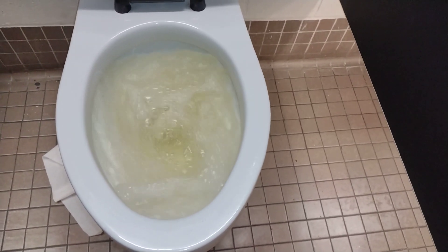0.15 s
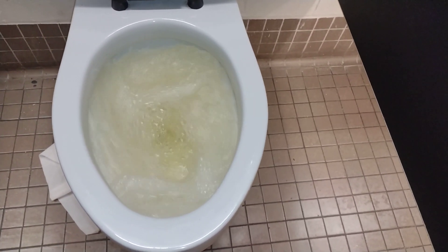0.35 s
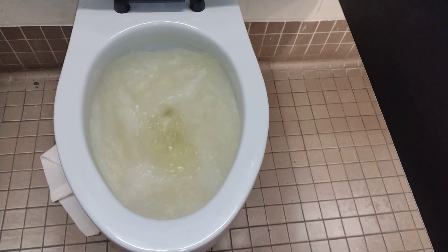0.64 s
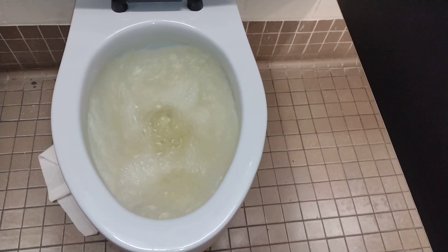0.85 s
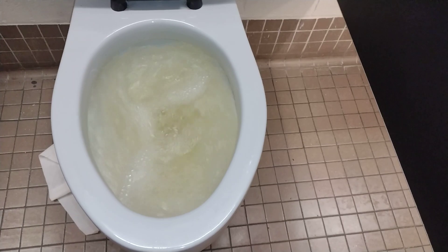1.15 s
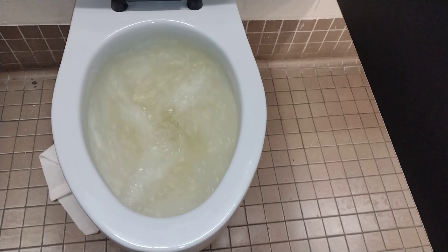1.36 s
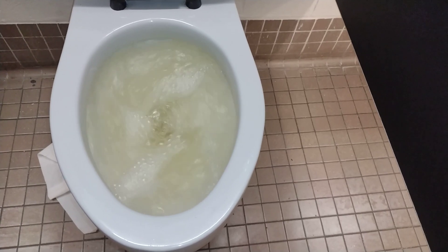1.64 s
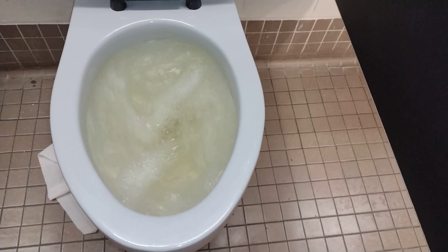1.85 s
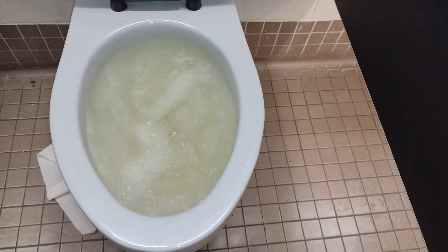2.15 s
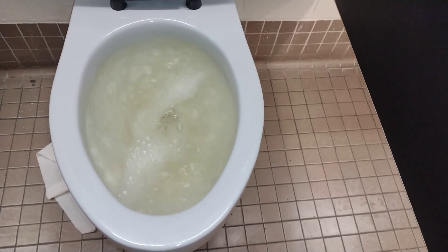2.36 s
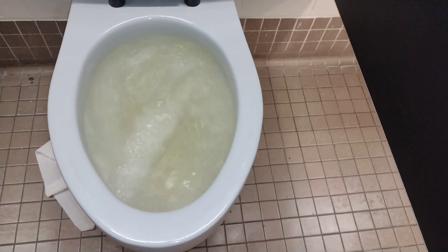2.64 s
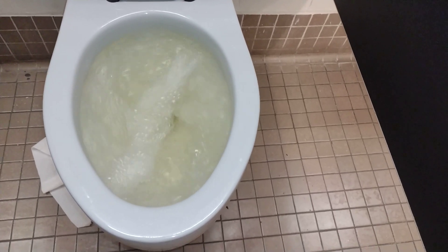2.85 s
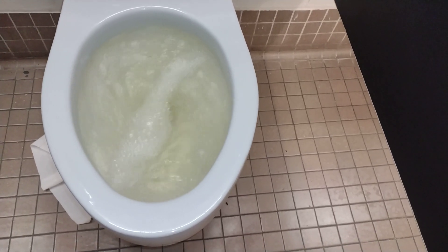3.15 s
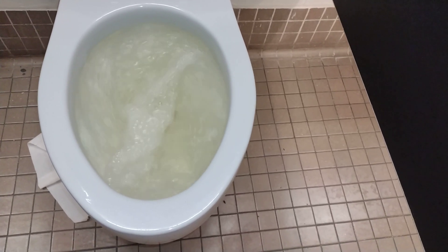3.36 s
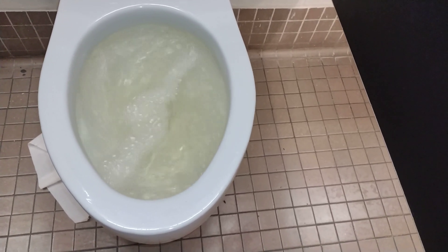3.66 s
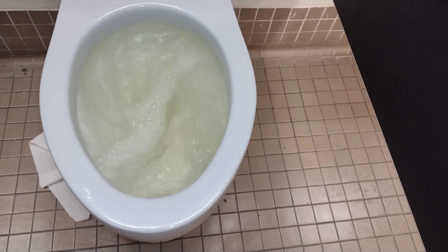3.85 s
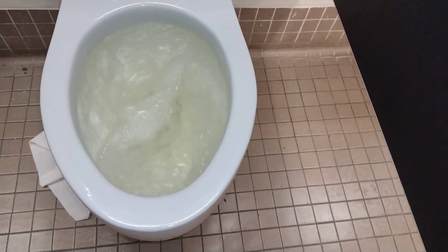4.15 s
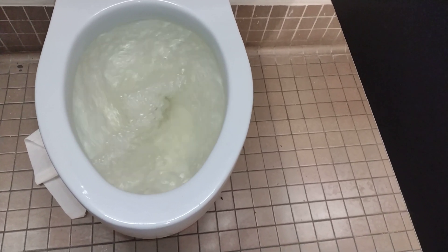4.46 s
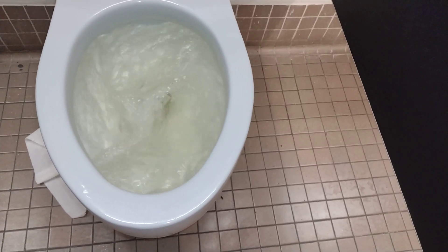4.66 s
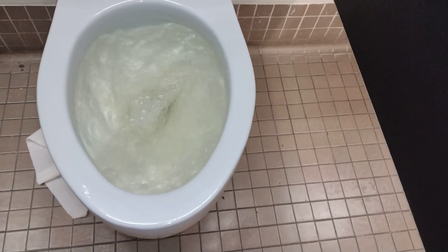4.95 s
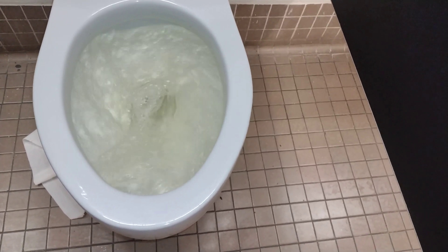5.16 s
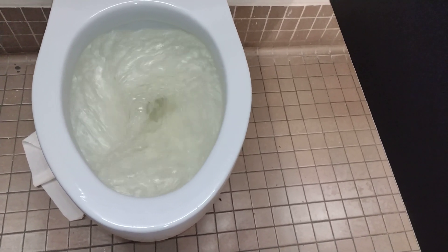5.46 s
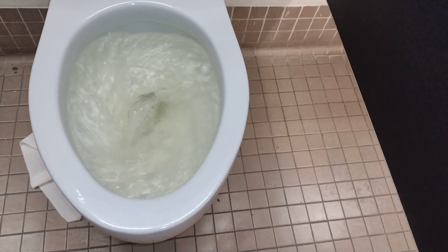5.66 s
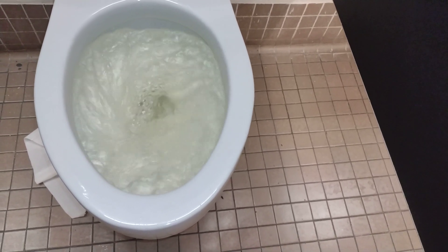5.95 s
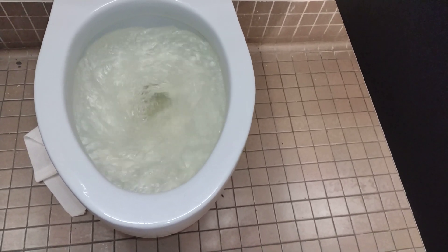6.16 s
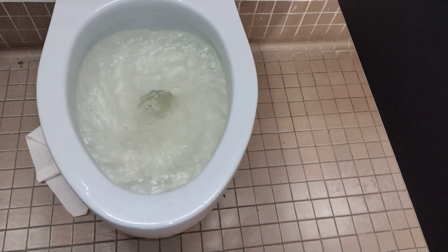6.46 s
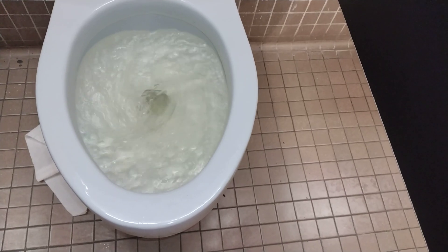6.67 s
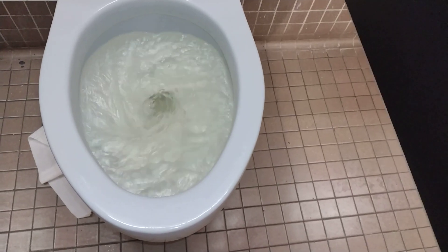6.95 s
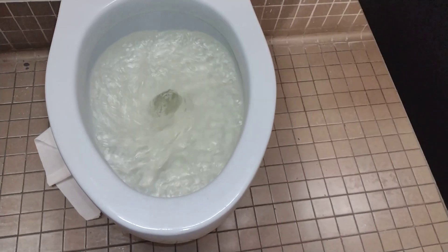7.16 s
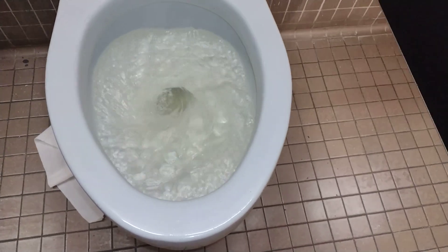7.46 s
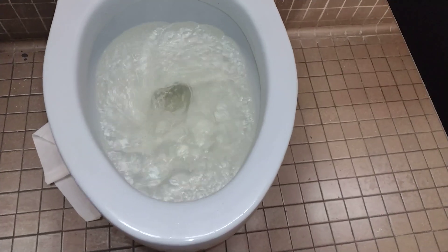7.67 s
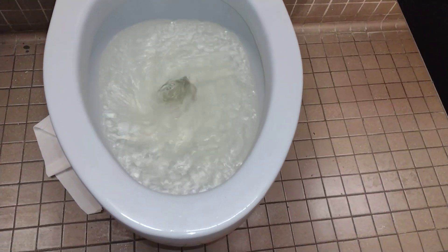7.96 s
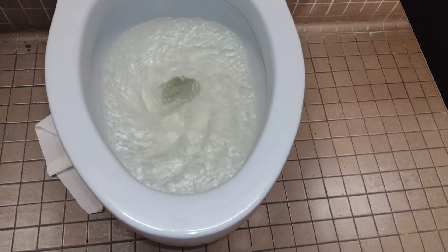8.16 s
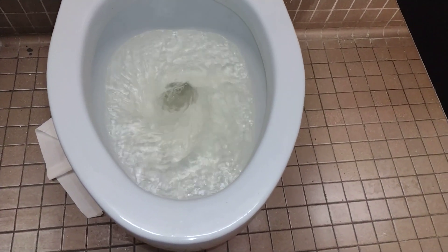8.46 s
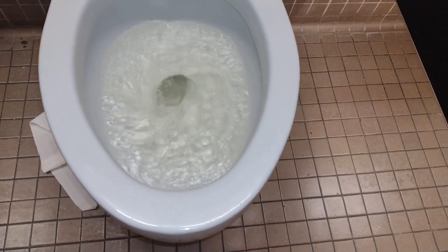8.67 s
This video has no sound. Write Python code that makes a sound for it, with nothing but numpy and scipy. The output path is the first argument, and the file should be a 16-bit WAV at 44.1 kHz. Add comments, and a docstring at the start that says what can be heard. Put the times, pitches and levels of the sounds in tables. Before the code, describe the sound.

A toilet already in full flush roars and hisses in a small tiled restroom, gurgles down, shuts off abruptly, and leaves sparse drips over faint hum.

```python
"""A rush of water comes first: jets hiss under a toilet rim, spray and foam roar, the trap gurgles and a
tiled room booms, all noise shaped by resonances. Air whistles in a rim hole; bubbles and bursts gulp and spurt.
The pressure-fed valve shuts, leaving ringing drips, foam ticks, a narrow drain ring and one knock
over air noise and a swelling hum. Two microphone ports a hand apart receive partly shared noise."""
import sys
import numpy as np
from scipy import signal
from scipy.fft import rfft, irfft, next_fast_len
from scipy.io import wavfile
from scipy.ndimage import uniform_filter1d

SR = 44100
rng = np.random.default_rng(int(sys.argv[2]) if len(sys.argv) > 2 else 0)


def put_to_file(sound):
    """Save the sound as 16-bit audio at rate SR, in the file named by the first command-line argument."""
    columns = np.atleast_2d(sound).T  # one column per channel
    safe = np.clip(columns, -1, 1)
    whole_steps = np.round(safe * 32767)
    wavfile.write(sys.argv[1], SR, whole_steps.astype(np.int16))


N = 388521  # samples
T = np.arange(N) / SR  # time, s

# Ventilation and trickle spectrum: frequency_hz, relative_density_db (per Hz)
QUIET_SPECTRUM = [(24, -42.5), (40, -12), (112, -2.5), (176, -10), (312, -4), (433, -13.5), (1020, -13),
                  (1440, -24), (1810, -20.5), (2840, -26), (4500, -33.5), (14800, -45.5), (16000, -45)]
# Room and drain resonances under the trickle: frequency_hz, width_hz, relative_level_db
PIPE_MODES = [(79.7, 15, -3), (118.8, 17, -1), (255, 41, -3.5), (355, 46, -6.5), (500, 24, -7),
              (650, 21, -7.5), (1060, 29, -11.5), (1340, 30, -17), (1575, 52, -17.5), (1800, 35, -8.5),
              (2240, 1400, -22.5)]
# Coherence of the two ports: frequency_hz, shared_fraction
PORT_COHERENCE = [(60, 1), (250, 0.89), (550, 0.72), (800, 0.26), (1500, 0.62), (2500, 0.28), (5000, 0.025),
                  (15000, 0.067)]
# Spectral balance of the ports: frequency_hz, left_minus_right_db
PORT_TILT = [(60, -1.5), (130, 0.5), (290, -1), (640, 1.5), (1410, -3), (3100, 1.5), (6820, 0.5),
             (15000, -0.5)]
# Drips and large drain bubbles: start_s, level_db, pitch_hz (at onset)
BUBBLES = [(5.7254, -56, 2600), (5.765, -60, 2390), (5.784, -59, 463), (5.933, -43, 1094),
           (5.926, -49, 1620), (6.058, -59, 1850), (6.243, -60.5, 2200), (6.288, -62, 1760),
           (6.298, -50, 1060), (6.436, -56, 354), (6.52, -58, 2020), (6.6, -54.5, 327), (6.651, -63, 2240),
           (6.761, -60, 1712), (7.199, -52.5, 374), (7.2404, -56.5, 2080), (7.249, -52.5, 322),
           (7.325, -67, 2200), (7.482, -57, 257), (7.5617, -54.5, 2200), (7.627, -62, 3930),
           (7.685, -64.5, 2400), (7.6874, -61, 1490), (7.719, -58, 2910), (7.734, -56, 622),
           (7.738, -57, 1820), (7.785, -65, 2300), (7.806, -50.5, 1400), (8.025, -53, 640),
           (8.0694, -57.5, 1400), (8.1502, -59, 1396), (8.16, -57, 3690), (8.2167, -59.5, 1745),
           (8.217, -55, 3040), (8.3184, -62, 4060), (8.4716, -55, 2100), (8.477, -56, 2510),
           (8.572, -51, 2104), (8.6198, -58, 1035)]
# Foam bursting: start_s, level_db (before the shares of snap and ring), centre_hz (of the ring)
TICKS = [(5.7035, -38, 4900), (5.7634, -57, 8460), (5.8052, -52, 8800), (5.8163, -50, 6270),
         (5.8541, -44, 11100), (5.8898, -44.5, 6020), (5.9835, -46, 10670), (6.0342, -48, 3880),
         (6.0583, -58, 7280), (6.0706, -53, 9700), (6.124, -54.5, 4110), (6.2229, -59.5, 11000),
         (6.3232, -58, 5920), (6.345, -56, 4000), (6.5008, -53, 6600), (6.5136, -54, 4160),
         (6.7024, -58, 5100), (6.7207, -49, 4600), (6.7412, -59, 6670), (6.759, -48, 5700),
         (7.2356, -57, 8600), (7.2975, -57.5, 7440), (7.3179, -55, 12300), (7.3417, -48, 6300),
         (7.3824, -59, 10470), (7.6267, -54.5, 10440), (7.7288, -54, 7370), (7.8057, -53, 4340),
         (7.8214, -55, 6160), (7.8535, -48, 3620), (8.135, -60, 4500), (8.4384, -55.5, 10260),
         (8.6459, -56.5, 7610)]
# Modes of the knocked object: frequency_hz, relative_level_db, t60_s
KNOCK_MODES = [(835, -6, .04), (2690, -2, .03), (2915, 0, .045), (3270, -1, .03), (3550, -6, .02)]
# Slugs slapping the trap or rim hole: start_s, level_db (before the shares), pitch_hz (at onset)
GULPS = [(0.319, -6, 1240), (0.503, -8, 1420), (0.598, -10, 1010), (0.685, -1.5, 1780), (0.893, -4.5, 1200),
         (1.542, -5, 1710), (2.609, -8, 1780), (2.696, -4, 1134), (2.756, -12, 950), (2.867, -6.5, 900),
         (2.995, -14, 770), (3.092, -18, 791), (3.122, -8.5, 850), (3.15, -3.5, 1020), (3.201, -11, 810),
         (3.322, -19, 1000), (3.443, -24, 745), (3.468, -6.5, 1075), (3.56, -16, 738), (3.65, -20, 727),
         (3.8, -11.5, 698), (3.975, -20, 764), (4.147, -12, 970), (4.338, -15.5, 1630), (4.42, -20, 1760),
         (4.454, -27, 1070), (4.496, -16.5, 1080), (4.526, -18, 1114), (4.649, -15.5, 1660),
         (4.772, -21.5, 1270), (4.868, -24, 980), (4.884, -20, 860), (4.924, -23.5, 750),
         (4.788, -18.5, 1140), (4.972, -20.5, 1280), (4.975, -22.5, 1800), (5.017, -26.5, 750),
         (5.163, -39, 795), (5.19, -42, 198), (5.204, -34, 765), (5.248, -30.5, 1660)]
# Spray bursts: start_s, level_db (before the shares), centre_hz, lift_db (of the jets), lift_length_s
SPURTS = [(0.092, -6, 5000, 2.5, 0.028), (0.127, -16, 4970, 3.5, 0.24), (0.21, -8, 5360, 1, 0.016),
          (0.426, -12, 7000, 1.5, 0.2), (0.627, -13, 5620, 2.6, 0.14), (0.728, -4, 4660, 2.1, 0.035),
          (0.763, -15.5, 5500, 3, 0.33), (0.999, -11.5, 2540, 2.5, 0.063), (1.075, -2.5, 5740, 2.5, 0.075),
          (1.54, -2.5, 7200, 1, 0.0064), (1.829, -7, 5770, 3.5, 0.0095), (2.083, -8, 3080, 1.5, 0.014),
          (2.294, -13, 4740, 2.5, 0.045), (2.494, -7.5, 3850, 2, 0.014), (3.968, -13.5, 7600, 1.5, 0.025),
          (3.969, -16.5, 3240, 2.5, .03), (3.995, -21, 3930, -1, .008), (4.84, -29, 8000, -1.5, 0.019),
          (5.187, -28, 8150, 0, 0.035)]
# A pocket of air squeezed out: start_s, level_db, start_hz, end_hz, length_s
SQUIRT = (2.297, -16, 2600, 1750, .022)
# Rim-hole whistle: time_s, level_db (before the shares of noise and tone)
WHISTLE_LEVEL = [(.24, -42), (.296, -29.5), (.4, -35.5), (.46, -27.5), (.528, -18.5), (.604, -28.5),
                 (.655, -29), (.69, -26), (.75, -32.5), (.795, -23), (.84, -25), (.872, -40), (.95, -21.5),
                 (1.0, -31.5), (1.032, -24), (1.074, -33.5), (1.13, -23), (1.165, -35.5), (1.4, -31.5),
                 (1.75, -36)]
# Jet hiss spectrum: frequency_hz, relative_density_db (per Hz)
JET_SPECTRUM = [(3240, -29.5), (5500, -13), (6230, -4), (6820, 0), (8900, -0.5), (9600, -3), (13600, -3.5),
                (15200, -5), (16000, -13.5)]
# Dips and one ridge cut into the hiss by the emptying bowl: frequency_hz, width_hz, change_db
RIM_DIPS = [(2590, 65, -10), (2820, 100, -10), (3500, 74, -6.5), (4480, 100, -7.5), (5000, 60, -3.5),
            (5610, 110, -11.5), (7100, 100, -8.5), (8880, 420, 2.5), (9150, 200, -5.5), (9920, 150, -3.5),
            (10160, 150, -2.5)]
# Spray resonances, bowl full and then with the trap pulling: frequency_hz, width_hz, relative_level_db
SPRAY_FULL = [(2410, 110, -12), (3096, 60, 0), (3700, 410, -8.5), (4850, 330, -4), (5420, 200, -1.5),
              (5750, 110, 1.5), (6960, 160, -2.5)]
SPRAY_PULL = [(2540, 67, -5.5), (2754, 48, 0), (3097, 590, -3.5), (3730, 140, -12), (4020, 310, -9),
              (4870, 360, -3), (5420, 300, -1.5), (6260, 480, -1.5)]
# Bowl resonances, full, pulling and with the trap nearly empty: frequency_hz, width_hz, relative_level_db
BOWL_FULL = [(684, 160, -3.5), (830, 310, -5.5), (1050, 100, 0.5), (1140, 520, -3), (1426, 60, -2.5),
             (1730, 110, -4), (2070, 55, -3)]
BOWL_PULL = [(644, 38, -6), (741, 32, 1.5), (797, 55, -5.5), (894, 90, -7), (1080, 150, -2),
             (1168, 92, -0.5), (1320, 65, -4), (1440, 93, -5.5), (1670, 47, -2.5), (1920, 34, -8.5)]
BOWL_LOW = [(740, 110, 2), (863, 86, -0.5), (1085, 150, 4.5), (1338, 39, 8), (1654, 220, -2.5),
            (1940, 27, 0.5)]
# Room air modes, boom, deep and those heard only at first: frequency_hz, width_hz, relative_level_db
BOOM_MODES = [(258, 27, -9), (346, 73, -6.5), (403.3, 11, 6.5), (462, 15, -4), (528, 36, -6)]
DEEP_MODES = [(79.8, 6, 3), (124, 16, 1.5), (165.5, 15, -4), (218.5, 51, -2.5)]
EARLY_MODES = [(466.5, 20, 0), (489, 20, -3.5)]
# Progress of the flush: time_s, jet_flow_db, bowl_water_db
FLOW = [(0.0, -21, -27.5), (.22, -22, -30.5), (.37, -21.5, -27), (.5, -20, -28.5), (1.0, -23, -28.5),
        (1.19, -21.5, -27.5), (1.42, -19, -26.5), (1.7, -20.5, -27), (2.35, -22, -27.5), (2.8, -22, -26.5),
        (3.69, -27.5, -28), (4.05, -33, -33), (4.55, -42.5, -37), (5.2, -47, -44), (5.275, -51.5, -58),
        (5.305, -59, -56), (5.4, -65.5, -69), (5.88, -72.5, -71.5), (6.1, -71, -69)]

LAG, ROOM_LAG = 20, 8  # samples by which bowl sound and room air reach the right port later
PULL_S, LOW_S = 2.503, 4  # the trap starts to pull, then runs nearly empty
LAST_S, SHUT_S = 4.99, 5.3  # only the lowest gurgle is left, then the valve has shut
QUIET_DB, HISS_DB = -64, -82  # air noise and microphone self-noise
HUM_HZ, HUM_EARLY_DB, HUM_LATE_DB = 312.7, -78, -68  # levels before the shares of tone and waver
HUM_SWELL_S, HUM_RISE_S = 6.2, 1.0  # start and length of the swell
DRAIN_HZ, DRAIN_DB, DRAIN_FADE_S, DRAIN_FADE_LENGTH_S = 1070, -77, 6.2, 0.82
DRAIN_RING = 0.3  # how strongly a drip sets the drain ringing
CYCLES_AT_1K, CYCLES_SLOPE = 21., .4  # smaller bubbles ring for more cycles
CLIMB_AT_2K, CLIMB_SLOPE, CLIMB_MOST = .04, 3.1, .045  # and climb further in pitch, up to a limit
DRIP_SPLASH = .45  # greatest share of splash in a small drip
TICK_SNAP, TICK_RING = .6, 0.93  # shares of wide snap and narrow ring
KNOCK_S, KNOCK_DB = 7.272, -41
GULP_RING, GULP_SPLASH = 0.54, 0.46  # shares of bubble and splash
SPURT_RING, SPURT_SPLASH = .3, 0.7
TRAP_TOP_HZ = 2140  # low-pass corner of the gulps in the trap
WHISTLE_HZ, WHISTLE_WANDER_HZ = 1672, 24  # centre and rms wander of the tone
WHISTLE_NOISE, WHISTLE_TONE = 0.76, .7  # shares of narrow noise and clear tone
POCKET_DB, POCKET_START_S, POCKET_ATTACK_S = -31.5, 0.2, 0.044  # a second air pocket
POCKET_HOLD_S, POCKET_RELEASE_S = 0.41, 0.05
POCKET_START_HZ, POCKET_END_HZ = 2302, 1286  # its pitch drops as it closes
POCKET_DROP_S, POCKET_GLIDE_S = 0.285, 0.019  # middle and time constant of the drop
FULL_FLOW_DB = -20  # reference jet flow
SPRAY_DB, SPRAY_FOLLOWS, SPRAY_AFTER_DB = -23, 1.14, 11.5  # falls faster than flow; raised at the shutting
BOOM_DB, BOOM_FOLLOWS, BOOM_FULL_DB = -41.5, 0.56, 8  # room air sinks slower than the flow
DEEP_DB, DEEP_FOLLOWS, DEEP_FULL_DB = -43, 0.65, 5  # and is louder until the trap pulls
AIR_FADE_S = 0.65
EARLY_DB, EARLY_END_S, EARLY_FADE_S = -36, 1.1, 0.97
SPRAY_LIFT, BOWL_LIFT = 1.7, 0.54  # how strongly spray and bowl follow the lift of a spurt
EDGE_HZ = 15850  # upper band limit


def amp(db):
    """Decibel definition: amplitude is ten to the power of level over twenty."""
    return 10 ** (np.asarray(db) / 20)


def evened(x):
    """Normalisation to unit root mean square."""
    return x / np.sqrt(np.mean(x ** 2) + 1e-20)


def evened_pair(pair):
    """Joint normalisation: the mean of both ports gets unit root mean square."""
    return pair / np.sqrt(np.mean(pair.mean(0) ** 2))


def read(points, hz):
    """Interpolation on a logarithmic frequency axis."""
    f, value = np.transpose(points)
    return np.interp(np.log(hz + 1), np.log(f + 1), value)


def curve(rows, column):
    """Linear interpolation of one table column over time."""
    rows = np.array(rows)
    return np.interp(T, rows[:, 0], rows[:, column])


def ramp(start, length):
    """Linear transition from 0 to 1."""
    return np.clip((T - start) / length, 0, 1)


def envelope(start, attack, hold, release):
    """Linear attack, hold and linear release."""
    return ramp(start, attack) * (1 - ramp(start + attack + hold, release))


def add(mix, s, sound):
    """Superposition: a sound is summed into the mix from a given second."""
    part = mix[round(s * SR):][:len(sound)]
    part += sound[:len(part)]


def modes(table, hz, order=2):
    """Modal response: the powers of separate resonances add."""
    powers = [amp(db) ** 2 / (1 + (2 * (hz - f) / width) ** 2) ** order for f, width, db in table]
    return np.sqrt(sum(powers))


def bank(table, valley_db, lo_hz, hi_hz):
    """Resonances over a valley floor, bounded by steep band edges."""
    def gain(hz):
        edges = np.sqrt((1 + (lo_hz / (hz + 1)) ** 24) * (1 + (hz / hi_hz) ** 24))
        return (modes(table, hz) + amp(valley_db)) / edges
    return gain


def filtered(x, gain):
    """Linear filtering: each spectral component is multiplied by a real gain."""
    size = next_fast_len(N)
    hz = np.fft.rfftfreq(size, 1 / SR)
    return irfft(rfft(x, size) * gain(hz), size)[:, :N]


def coloured(x, gain):
    """Spectral shaping followed by joint normalisation."""
    return evened_pair(filtered(x, gain))


def noise(colour, size, patchy_db, count=LAG, patch_hz=402.0, patch_s=0.055):
    """Partial coherence: two ports share some noise, with louder and softer patches in time and frequency."""
    hop, hz = size // 4, np.fft.rfftfreq(size, 1 / SR)
    a, b, c, d, patch = rng.standard_normal((N // hop + 5, len(hz), 5)).T
    patch = uniform_filter1d(patch, int(patch_hz / hz[1]) + 1, axis=0)
    patch = evened(uniform_filter1d(patch, int(patch_s * SR / hop) + 1, axis=1))
    patch_depth = np.minimum(hz / (2 * patch_hz), 1)[:, None]  # shallower at low frequency
    patch_gain = amp(patchy_db * patch * patch_depth)
    late = 2 * np.pi * hz * count / SR * (hz > 850)  # low room air moves both ports together
    same = np.clip(read(PORT_COHERENCE, hz), 0, 1)[:, None]
    left = a + 1j * b
    right = same * left + np.sqrt(1 - same ** 2) * (c + 1j * d)
    right = right * np.exp(-1j * late)[:, None]
    half = amp(read(PORT_TILT, hz) / 2)[:, None]
    spectra = np.array([left * half, right / half]) * colour(hz)[:, None] * patch_gain
    return evened_pair(signal.istft(spectra, nperseg=size, noverlap=size - hop)[1][:, :N])


def surges(per_s, spread_db, fall_s, share):
    """Shot process: level jumps as slugs of water land and then sinks back; mean power is near 1."""
    size = amp(2 * spread_db * np.minimum(rng.exponential(1, N), 4))
    hits = size * (rng.random(N) < per_s / SR)
    decay = np.exp(-T[:4000] / fall_s) * (1 - np.exp(-T[:4000] / 0.0013))
    power = signal.oaconvolve(hits, decay)[:N]
    share = np.clip(share, 0, 1)
    return np.sqrt(1 - share + share * abs(power) / power.mean())


def bubble(hz, cycles, rise):
    """Damped bubble oscillation: positive rise lifts the pitch, as near the surface; negative lowers it."""
    u = np.arange(round(3 * cycles * SR / hz)) / SR * hz / cycles
    onset = np.sin(np.minimum(u * cycles / 4, 1) * np.pi / 2) ** 2
    return 1.6 * np.sin(2 * np.pi * cycles * (u + rise * u ** 2)) * np.exp(-2 * u) * onset


def puff(hz, width, t60, rise_s):
    """Band-passed noise burst with exponential decay; width is a frequency ratio to each side."""
    t = T[:5000]
    edges_hz = np.clip([hz / width, hz * width], 50, 20000)
    band_filter = signal.butter(2, edges_hz, "band", fs=SR, output="sos")
    band = signal.sosfilt(band_filter, rng.standard_normal(len(t)))
    return 1.1 * evened(band) * amp(-60 * t / t60) * (1 - np.exp(-t / rise_s))


def restroom(x, wet_db, count):
    """Sparse reflection: direct sound, count samples later at the right port, then echoes off the tiles."""
    taps = np.zeros((2, SR // 2))
    at = np.arange(130, SR // 2 - 20, 20) + rng.integers(0, 20, (2, (SR // 2 - 131) // 20))
    np.put_along_axis(taps, at, rng.choice([-1., 1.], at.shape), 1)
    taps *= amp(-60 * T[:SR // 2] / 0.22)  # reverberation time 0.22 s
    taps *= amp(wet_db) / np.linalg.norm(taps[0])
    taps[[0, 1], [0, count]] = 1
    return signal.fftconvolve(x[None], taps, axes=1)[:, :N]


def quiet_colour(hz):
    """Additive spectrum of ventilation, trickle and pipe modes, cut below 40 Hz."""
    return (amp(read(QUIET_SPECTRUM, hz)) + modes(PIPE_MODES, hz)) / (1 + (40 / (hz + 1)) ** 3)


def background():
    """Steady noise: room and drain modes colour the air; a sine and narrow noise hum; the microphone hisses."""
    air = noise(quiet_colour, 2048, 2.8, count=ROOM_LAG, patch_hz=152.0, patch_s=.07)
    air *= surges(33, 2.0, .02, .3)
    waver = noise(lambda hz: modes([(311.5, 5, 5.5), (326, 6, -4.5)], hz), 16384, 0)
    hum = .8 * np.sqrt(2) * np.sin(2 * np.pi * HUM_HZ * T) + .3 * waver
    hum_db = HUM_EARLY_DB + (HUM_LATE_DB - HUM_EARLY_DB) * ramp(HUM_SWELL_S, HUM_RISE_S)
    hiss = noise(lambda hz: np.minimum(hz / 2500, 1) / (1 + hz / 9000), 256, 0)
    return amp(QUIET_DB) * air + amp(hum_db) * hum + amp(HISS_DB) * hiss


def drain():
    """Narrow-band resonance: patchy noise that rings on after the valve shuts and fades away."""
    ring = noise(lambda hz: modes([(DRAIN_HZ, 45, 0)], hz), 2048, 3.0, count=ROOM_LAG, patch_hz=152.3)
    return amp(DRAIN_DB) * (1 - ramp(DRAIN_FADE_S, DRAIN_FADE_LENGTH_S)) * ring


def knock():
    """Modal impact: damped sines sum to one knock on something hard."""
    out, t = np.zeros(N), T[:4000]
    ring = sum(amp(db - 60 * t / t60) * np.sin(2 * np.pi * hz * t) for hz, db, t60 in KNOCK_MODES)
    add(out, KNOCK_S, amp(KNOCK_DB) * ring * (1 - np.exp(-t / 0.00085)))
    return out


def tick(hz):
    """Film rupture: a wide noise snap with a narrower ring behind it."""
    return TICK_SNAP * puff(hz * 1.1, 1.94, 0.0092, .0004) + TICK_RING * puff(hz, 1.15, 0.016, .0015)


def drip(hz):
    """Bubble resonance: small bubbles ring for more cycles, climb further and land with a rough splash."""
    out = DRIP_SPLASH * np.clip(hz / 2000 - .5, 0, 1) * puff(hz * 0.76, 1.5, 0.037, .002)
    cycles = CYCLES_AT_1K * (hz / 1000) ** CYCLES_SLOPE
    climb = min(CLIMB_AT_2K * (hz / 2000) ** CLIMB_SLOPE, CLIMB_MOST)
    add(out, 0, bubble(hz, cycles, climb)[:len(out)])
    return out


def trickle():
    """Impulsive excitation: drips set the drain ringing, among foam ticks and faint chance events."""
    out = np.zeros(N)
    for s, db, hz in BUBBLES:
        add(out, s, amp(db) * drip(hz))
    t = T[:4000]
    ring = sum(np.exp(-np.pi * w * t) * np.sin(2 * np.pi * f * t) * w for f, w, _ in PIPE_MODES[5:10])
    out += DRAIN_RING * 2 * np.pi / SR * signal.oaconvolve(out, ring)[:N]
    for s, db, hz in TICKS:
        add(out, s, amp(db) * tick(hz))
    when, pitch, size = rng.random((480, 3)).T
    when = SHUT_S + (N / SR - SHUT_S) * when ** 1.2  # denser soon after the valve shuts
    for k in range(0, 480, 4):  # one drip, one tick and two drain rings at a time
        add(out, when[k], amp(-77 + 11 * size[k] ** 3) * drip(1800 * 3.5 ** pitch[k]))
        add(out, when[k + 1], amp(-69 + 11 * size[k + 1] ** 2) * tick(3300 * 3.5 ** pitch[k + 1]))
        for j in (k + 2, k + 3):
            ring_hz = PIPE_MODES[3 + int(pitch[j] * 7)][0] * rng.uniform(.96, 1.04)
            ring_db = -71.0 + 9.0 * size[j] - 2.4 * np.log2(ring_hz / 1000)
            add(out, when[j], amp(ring_db) * bubble(ring_hz, ring_hz * 0.015, 0))
    return out


def squirt(start_hz, end_hz, length):
    """Frequency modulation: an escaping air pocket has a wobbling, falling pitch and one overtone."""
    t = T[:round(length * SR)]
    wobble_hz = 1000.0 * uniform_filter1d(rng.standard_normal(len(t)), size=40)
    turns = np.cumsum(start_hz + (end_hz - start_hz) * np.sqrt(t / length) + wobble_hz) / SR
    tone = np.sin(2 * np.pi * turns) + 0.3 * np.sin(4 * np.pi * turns)
    return tone * signal.windows.tukey(len(t), .3) * amp(-4.0 * t / length)


def splashes():
    """Impact and bubble resonance: low-passed gulps in the trap, spurts of spray and the squirt."""
    out = np.zeros(N)
    for s, db, hz in GULPS:
        add(out, s, amp(db) * GULP_SPLASH * puff(hz, 1.45, 0.04, 0.0088))
        add(out, s, amp(db) * GULP_RING * bubble(hz, 8.5, 0.018))
    out = signal.sosfilt(signal.butter(6, TRAP_TOP_HZ, fs=SR, output="sos"), out)
    for s, db, hz, _, _ in SPURTS:
        add(out, s, amp(db) * SPURT_SPLASH * puff(hz, 1.1, 0.045, 0.006))
        add(out, s, amp(db) * SPURT_RING * bubble(hz, 34.0, -0.006))
    s, db, start_hz, end_hz, length = SQUIRT
    add(out, s, amp(db) * squirt(start_hz, end_hz, length))
    return out


def rim_whistle():
    """Hole tone: air in a rim hole gives narrow noise and a sine that wanders round one pitch."""
    level = amp(curve(WHISTLE_LEVEL, 1))
    level = level * ramp(WHISTLE_LEVEL[0][0], .03) * (1 - ramp(WHISTLE_LEVEL[-1][0], 0.25))
    wander = WHISTLE_WANDER_HZ * evened(uniform_filter1d(rng.standard_normal(N), size=500))
    tone = np.sqrt(2) * np.sin(2 * np.pi * np.cumsum(WHISTLE_HZ + wander) / SR)
    breath = noise(lambda hz: modes([(WHISTLE_HZ, 130, 0)], hz), 2048, 0.87)
    return level * (WHISTLE_NOISE * breath + WHISTLE_TONE * np.array([tone, np.roll(tone, LAG)]))


def air_pocket():
    """Frequency shifting: an analytic narrow noise is carried along the falling pitch of a closing pocket."""
    high_share = (1 - np.tanh((T - POCKET_DROP_S) / POCKET_GLIDE_S / 2)) / 2
    hz = POCKET_END_HZ + (POCKET_START_HZ - POCKET_END_HZ) * high_share
    slide = np.exp(2j * np.pi * np.cumsum(hz - WHISTLE_HZ) / SR)
    band = noise(lambda f: modes([(WHISTLE_HZ, 300, 0)], f), 1024, 0.62, patch_hz=150.)
    gliding = (signal.hilbert(band, next_fast_len(N))[:, :N] * slide).real
    level = envelope(POCKET_START_S, POCKET_ATTACK_S, POCKET_HOLD_S, POCKET_RELEASE_S)
    return amp(POCKET_DB) * level * gliding


def room_air(modes_table, valley_db, lo_hz, hi_hz, patchy_db, patch_hz, patch_s):
    """Room modes: broadband noise excites slow, patchy resonances of the air."""
    colour = bank(modes_table, valley_db, lo_hz, hi_hz)
    return noise(colour, 4096, patchy_db, patch_hz=patch_hz, patch_s=patch_s)


def early_air():
    """Transient room modes: two resonances sound only at first and fade out."""
    ring = noise(lambda hz: modes(EARLY_MODES, hz), 4096, 2.4, patch_hz=40., patch_s=.2)
    return amp(EARLY_DB) * (1 - ramp(EARLY_END_S, EARLY_FADE_S)) * ring


def foam(per_s, spread_db):
    """Bubble cloud: crowds of 16 sizes, each bubble stronger at one port than the other."""
    out = np.zeros((2, N))
    for hz in np.geomspace(620, 2050, 16):
        size = amp(spread_db * np.minimum(rng.exponential(1, (2, N)), 3.6))
        hits = size * (rng.random((2, N)) < per_s / (32 * SR))
        out += signal.oaconvolve(hits, bubble(hz, 4.6, 0.022)[None], axes=1)[:, :N]
    return out + .5 * np.roll(out[::-1], LAG, 1)


def bowl_water(pull, low):
    """Changing cavity resonance: churning water and foam pass from full bowl to gurgling, emptying trap."""
    churn = noise(np.ones_like, 1024, 1.9)
    full = coloured(churn, bank(BOWL_FULL, -7.0, 540, 2150)) * surges(50, 2.2, 0.067, 0.23)
    # A one-second shift makes the gurgle differ from the full bowl
    gurgle = 0.79 * np.roll(churn, SR, 1) * surges(140, 1.8, .0045, .6)
    gurgle += 0.05 * coloured(foam(1200, 3.2), np.ones_like)
    last = .6 * ramp(LAST_S, .15) * (1 - ramp(SHUT_S - .05, .1))
    thin = (1 - last) * coloured(gurgle, bank(BOWL_LOW, -16.5, 650, 2800))
    thin += last * coloured(gurgle, bank(BOWL_LOW[:1], -17.5, 450, 3100))
    gurgle = (1 - low) * coloured(gurgle, bank(BOWL_PULL, -5, 626, 2046)) + low * thin
    port_balance = amp(np.array([[-.7], [.7]]) * low)  # dB, towards the right as the trap empties
    return np.cos(pull) * full + np.sin(pull) * gurgle * port_balance


def rim(x, share):
    """Spectral colouring: the dips and ridge of the emptying bowl blend into a hiss."""
    def dips(hz):
        return amp(sum(db / (1 + (2 * (hz - f) / width) ** 2) for f, width, db in RIM_DIPS))
    return (1 - share) * x + share * filtered(x, dips)


def bowl_spray(pull, spatter):
    """Resonant spray: mist noise crossfades from full-bowl modes to those of the pulling trap."""
    mist = noise(np.ones_like, 512, 1.9)
    spray = np.cos(pull) * coloured(mist, bank(SPRAY_FULL, .3, 2300, 6600))
    spray += np.sin(pull) * coloured(np.roll(mist, SR, 1), bank(SPRAY_PULL, -2.2, 2460, 5950))
    return rim(spray, np.sin(pull)) * spatter


def rim_jets(pull, low, spatter):
    """Turbulent jet noise: broadband hiss that sputters more as the jets weaken."""
    jet = noise(lambda hz: amp(read(JET_SPECTRUM, hz)), 256, 1.0) * spatter ** (1 + 1.7 * low)
    return rim(jet, np.sin(pull))


def spurt_lift():
    """Level modulation: each spurt briefly changes the rush, in decibels."""
    return sum(db * envelope(s - .003, 0.0076, length / 2, length / 2) for s, _, _, db, length in SPURTS)


def flush():
    """Superposed sources: jets, spray, bowl and room air follow the flow at different rates."""
    on = 1 - ramp(FLOW[-1][0] - .25, .25)
    pull = ramp(PULL_S, 0.26) * np.pi / 2  # angle of the equal-power crossfade
    low = ramp(LOW_S, .5)
    spatter = surges(60, 0.73, 0.012, 0.2)
    flow_db, lift_db = curve(FLOW, 1), spurt_lift()
    sunk_db = flow_db - FULL_FLOW_DB
    before = 1 - ramp(PULL_S - AIR_FADE_S / 2, AIR_FADE_S)
    spray_db = SPRAY_DB + SPRAY_FOLLOWS * sunk_db + SPRAY_LIFT * lift_db
    spray_db = spray_db + SPRAY_AFTER_DB * ramp(SHUT_S - .03, 0.044)
    bowl_db = curve(FLOW, 2) + BOWL_LIFT * lift_db
    boom_db = BOOM_DB + BOOM_FOLLOWS * sunk_db + BOOM_FULL_DB * before
    deep_db = DEEP_DB + DEEP_FOLLOWS * sunk_db + DEEP_FULL_DB * before
    rush = amp(flow_db + lift_db) * rim_jets(pull, low, spatter)
    rush += amp(spray_db) * bowl_spray(pull, spatter)
    rush += amp(bowl_db) * bowl_water(pull, low)
    rush += amp(boom_db) * room_air(BOOM_MODES, -14.5, 270, 520, 3.5, 40., 0.27)
    rush += amp(deep_db) * room_air(DEEP_MODES, -20.5, 70, 250, 3.2, 30., 0.41)
    return early_air() + on * rush


def scene():
    """Superposition at the two ports, with tile echoes on the short nearby sounds."""
    near = restroom(trickle(), -4, count=LAG)
    near += restroom(splashes(), -5, count=1)
    near += restroom(knock(), -5, count=6)
    return background() + drain() + near + rim_whistle() + air_pocket() + flush()


def record(dry):
    """Converter limits: a hard amplitude ceiling, then a linear-phase low-pass."""
    low_pass = signal.firwin(511, EDGE_HZ, window=("kaiser", 9), fs=SR)
    return signal.oaconvolve(np.clip(dry, -1, 1), low_pass[None], "same")


dry = scene()
out = record(dry)
put_to_file(out)
```